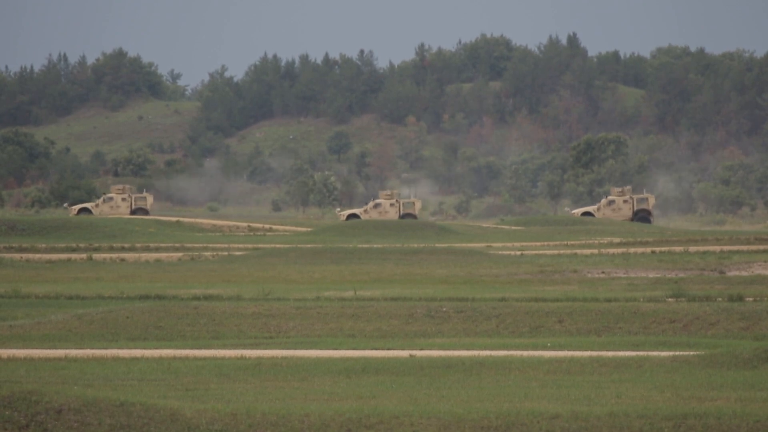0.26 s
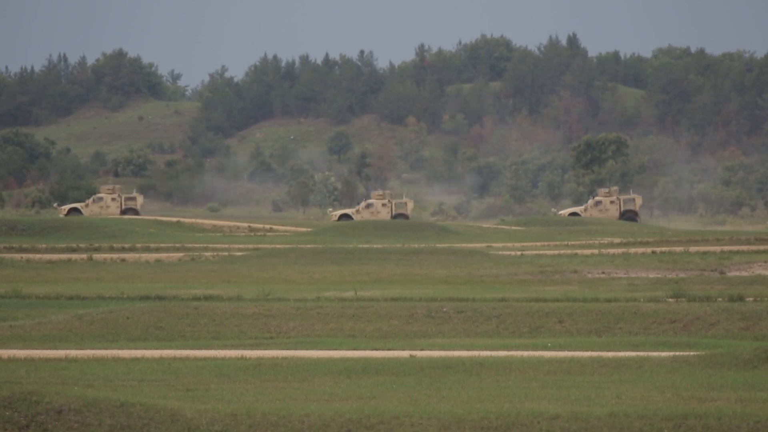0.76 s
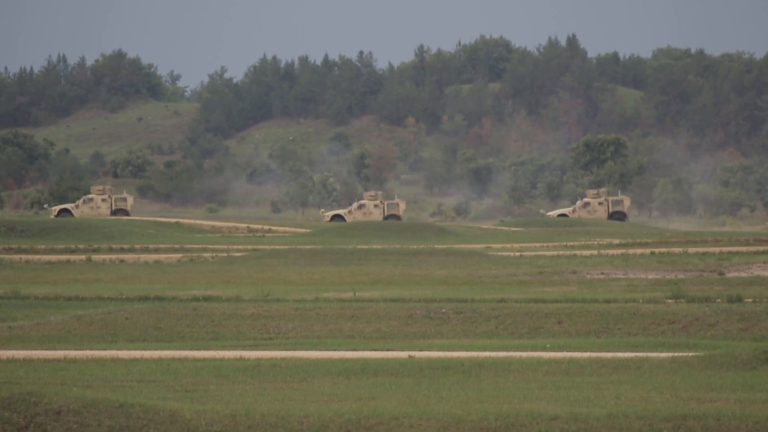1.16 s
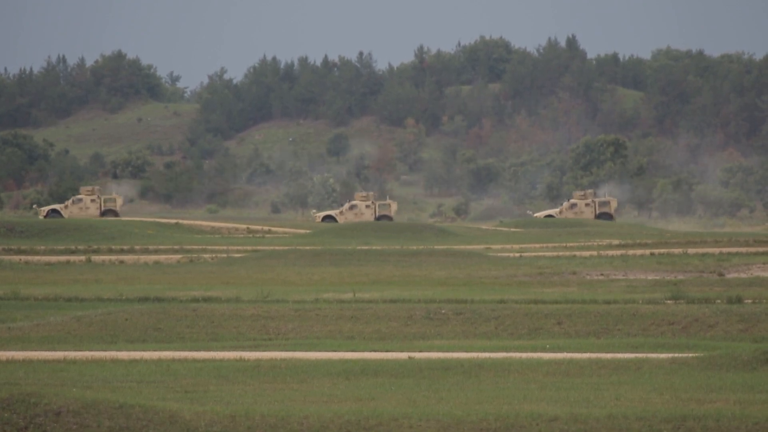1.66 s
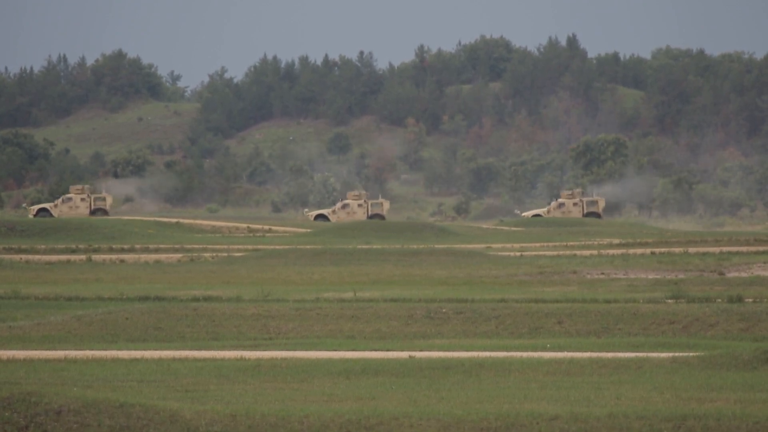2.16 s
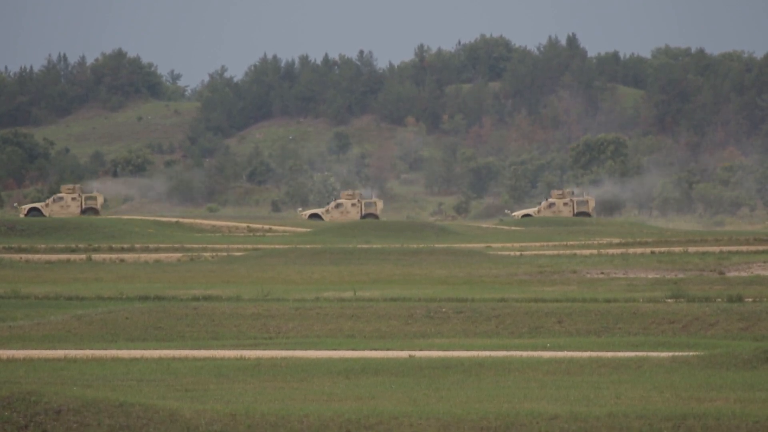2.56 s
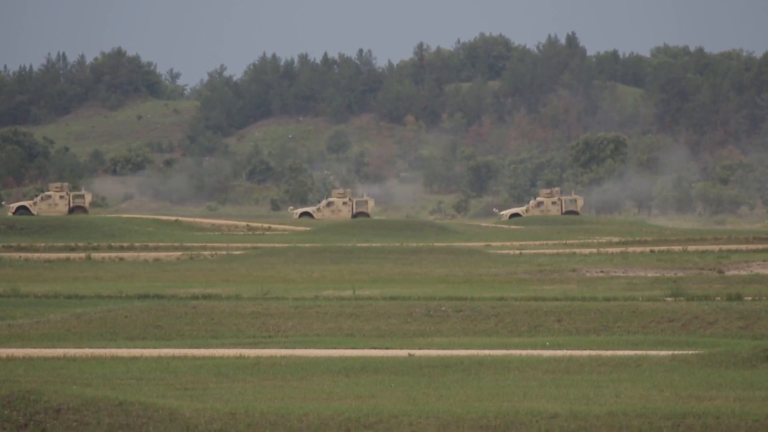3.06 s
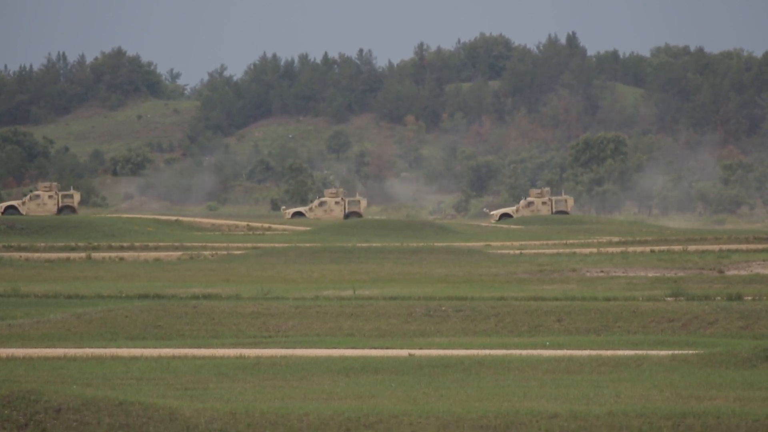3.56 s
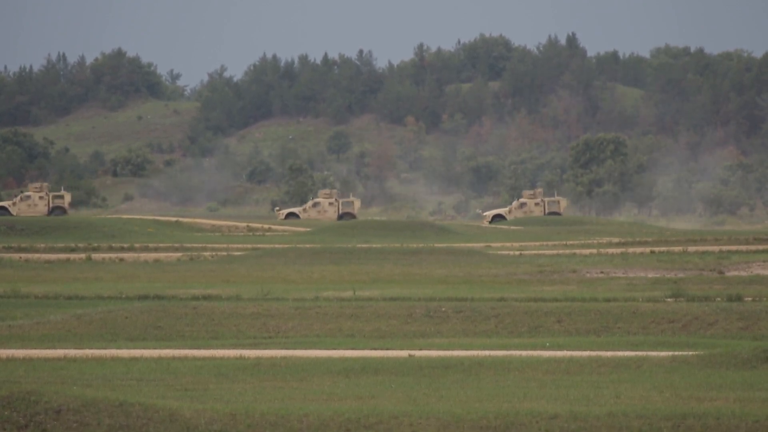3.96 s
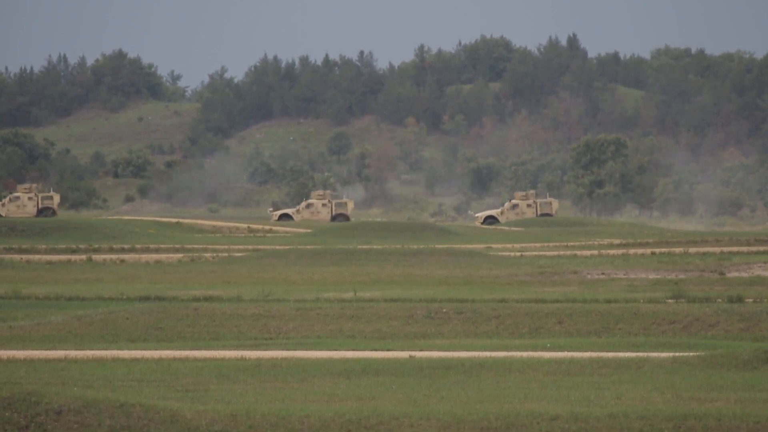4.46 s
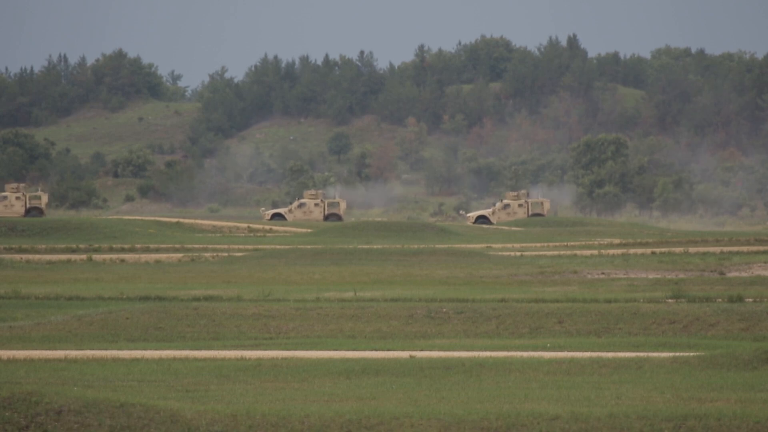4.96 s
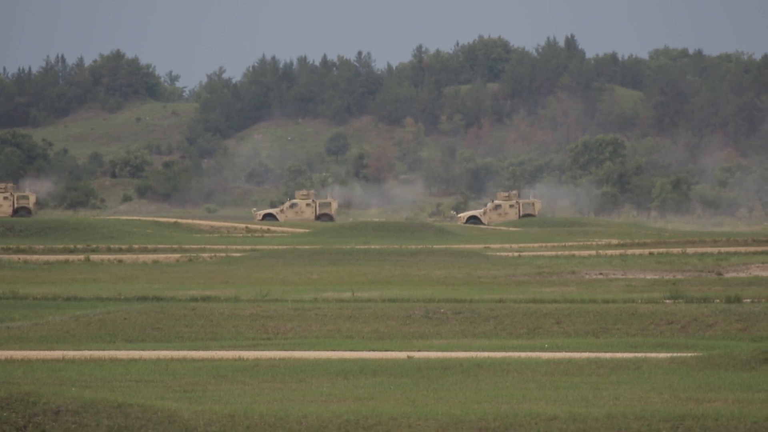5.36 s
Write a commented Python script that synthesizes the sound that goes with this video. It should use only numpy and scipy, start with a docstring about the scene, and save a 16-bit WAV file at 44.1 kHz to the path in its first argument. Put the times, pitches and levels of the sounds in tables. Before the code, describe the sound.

Distant crackling and closer deep, sharp heavy gun bursts hammer outdoors, with rolling hill echoes above a steady diesel rumble and faint hiss.

```python
"""Heavy machine guns on trucks fire overlapping bursts across a grass range: far crackling ones, a deep one, a sharp one.
Each muzzle blast is a shaped pressure front with a bounce off the ground, frayed by the turbulent air;
earth banks, brush, trees and a wooded hill answer with delayed copies and shaped noise.
Underneath, the trucks' engines rumble as wavering tones in coloured noise, loose steel clanks faintly
and distant engines, tyres and wind blend into a background hiss of coloured noise."""
import sys
import numpy as np
from scipy import signal
from scipy.fft import rfft, irfft, next_fast_len
from scipy.io import wavfile
from scipy.ndimage import map_coordinates

SR = 44100
rng = np.random.default_rng(int(sys.argv[2]) if len(sys.argv) > 2 else 0)


def store_pcm(level_fs):
    """Save levels as 16-bit WAV."""
    pcm = np.round(np.clip(level_fs, -1, 1) * 32767).astype(np.int16)
    wavfile.write(sys.argv[1], SR, np.atleast_2d(pcm).T)


N = 247401


def amp(db):
    """Decibels to gain."""
    return 10 ** (np.asarray(db) / 20)


def unit(x):
    """x at rms 1."""
    return x / np.sqrt(np.mean(x ** 2) + 1e-20)


def along(points, hz):
    """Read a curve of (f/Hz, value) points on a log frequency axis."""
    f, v = np.transpose(points)
    return np.interp(np.log(hz + 1), np.log(f + 1), v)


def over_time(points):
    """Read a curve of (t/s, value) points at every sample of the scene."""
    t, v = np.transpose(points)
    return np.interp(np.arange(N) / SR, t, v)


def wobble(rate):
    """A smooth random curve, rate knots a second."""
    knots = rng.standard_normal(int(N * rate / SR) + 4)
    return map_coordinates(knots, [np.arange(N) * rate / SR])


def filtered(x, response):
    """x times a response of frequency, padded so that the end does not wrap round."""
    m = next_fast_len(len(x) + SR // 2)
    spectrum = rfft(x, m) * response(np.fft.rfftfreq(m, 1 / SR))
    return irfft(spectrum, m)[:len(x)]


def noise(spectrum):
    """Noise of rms 1 with the given colour."""
    return unit(filtered(rng.standard_normal(N), lambda hz: amp(along(spectrum, hz))))


def causal(gain):
    """The minimum-phase response with this gain: a sharp front, nothing before it."""
    cepstrum = irfft(np.log(np.maximum(gain, 1e-6)))
    half = len(cepstrum) // 2
    folded = np.r_[cepstrum[0], 2 * cepstrum[1:half], np.zeros(half)]
    return np.exp(rfft(folded))


def below(hz, edge_hz):
    """Gain of a soft low-pass, one half at the edge."""
    return 1 / (1 + (hz / edge_hz) ** 4)


def add(track, s, sound):
    """Mix a sound into the track from time s."""
    part = track[round(s * SR):][:len(sound)]
    part += sound[:len(part)]


def far_guns():
    """Far guns: strong fraying by the air makes each blast crackle, and the hill answers loudest."""
    # far muzzle blast after its way over the range: f/Hz, relative level/dB per Hz
    far_blast = [(35, -14), (70, 6.5), (140, 6), (250, -5.5), (370, -8), (520, -3.5), (850, -7),
                 (1120, -15), (1380, -5.5), (1950, -18), (2550, -11), (3500, -13.5), (4500, -26),
                 (8000, -48)]
    # bursts: level before the gun gain/dB, thump/dB, crack of first shot/dB, crack of last shot/dB,
    # mean lag of the ground bounce/ms, list of shot times t/s; the guns cycle unevenly
    far_bursts = [(-25.4, -1.2, 2.5, -8, .75, [.76, .8968, 1.0128, 1.1209, 1.2313, 1.3412, 1.4657, 1.5802, 1.6917, 1.809, 1.9227, 2.0423]),
                  (-22.4, -3.3, -3, .5, 1.3, [1.816, 1.9329, 2.0732]),
                  (-27.7, 1.5, -.5, -5, 1.45, [3.606, 3.7343, 3.8517, 3.9647, 4.088, 4.2041, 4.3206, 4.4339, 4.5512]),
                  (-22.3, -2.5, 1.5, -2.5, 1.25, [4.669, 4.7802, 4.8944, 5.0127, 5.13, 5.2436])]
    shots = fire(far_bursts, swell_db_per_s=-.8)
    return gun(shots, far_blast, db=27, bounce=0.26, fray_db=7.7, fray_s=0.0031,
               brush_db=-6.5, brush_s=0.014, brush_hz=3920, trees_db=-11.5, trees_s=0.044, hill_db=-4.5)


def deep_gun():
    """Deep gun: a heavy low-mid blast, little frayed, with a weak ground bounce and dull brush."""
    # deep muzzle blast after its way over the range: f/Hz, relative level/dB per Hz
    deep_blast = [(35, -30), (70, 0), (140, 2.5), (250, -6.5), (400, -12), (600, 0.5), (950, -3.5),
                  (1170, -10), (1400, -4.5), (1950, -20), (2600, -13.5), (3400, -13), (4500, -24.5),
                  (8000, -56)]
    # burst: level before the gun gain/dB, thump/dB, crack of first shot/dB, crack of last shot/dB,
    # mean lag of the ground bounce/ms, list of shot times t/s
    deep_bursts = [(-18.1, -.4, 1, -2.5, 1.45, [2.1683, 2.2788, 2.3922, 2.5194])]
    shots = fire(deep_bursts, swell_db_per_s=0)
    return gun(shots, deep_blast, db=27, bounce=0.15, fray_db=-4, fray_s=0.0042,
               brush_db=-4.5, brush_s=.011, brush_hz=1980, trees_db=-17.5, trees_s=.045, hill_db=-9)


def sharp_gun():
    """Sharp gun: its crack swells in mid-burst, and brush and trees throw little back."""
    # sharp muzzle blast after its way over the range: f/Hz, relative level/dB per Hz
    sharp_blast = [(35, -14.5), (70, -4.5), (140, 4), (250, -3.5), (400, -6), (600, 0.5), (900, -9.5),
                   (1150, -21), (1450, -8.5), (2000, -9), (2600, -15), (3400, -13.5), (4500, -26),
                   (8000, -64)]
    # burst: level before the gun gain/dB, thump/dB, crack of first shot/dB, crack of last shot/dB,
    # mean lag of the ground bounce/ms, list of shot times t/s
    sharp_bursts = [(-21, .5, 1.2, -4.3, 1.33, [3.4888, 3.6262, 3.7461, 3.8658, 3.9827, 4.102, 4.2293, 4.3524, 4.4728, 4.5954, 4.7145, 4.8433])]
    shots = fire(sharp_bursts, swell_db_per_s=.6, arch_db=4.5)
    return gun(shots, sharp_blast, db=27, bounce=0.3, fray_db=1, fray_s=0.0029,
               brush_db=-9, brush_s=.011, brush_hz=3520, trees_db=-31, trees_s=0.032, hill_db=-7.5)


def fire(bursts, swell_db_per_s, arch_db=0):
    """Shots as (s, level dB, thump dB, crack dB, bounce lag ms); crack drifts over a burst, straight or in an arch."""
    opening_db = 2  # extra crack of the shot that opens a burst
    # from shot to shot the air changes the crack and the lag of the ground bounce a little
    crack_spread_db, lag_spread_ms = .6, .07
    shots = []
    for level_db, thump_db, first_db, last_db, lag_ms, times in bursts:
        for s, (air, ground) in zip(times, rng.standard_normal((len(times), 2))):
            elapsed = s - times[0]
            progress = elapsed / (times[-1] - times[0])
            drift_db = first_db + (last_db - first_db) * progress + arch_db * np.sin(np.pi * progress)
            crack_db = drift_db + opening_db * (elapsed == 0) + crack_spread_db * air
            shot_level_db = level_db + swell_db_per_s * elapsed
            shots.append((s, shot_level_db, thump_db, crack_db, lag_ms + lag_spread_ms * ground))
    return shots


def gun(shots, blast, db, bounce, fray_db, fray_s, brush_db, brush_s, brush_hz, trees_db, trees_s, hill_db):
    """Each shot is one pressure front that reaches the microphone over many paths."""
    # dull echoes off the earth banks around the listener, the same for every gun: mean delay/s, mean level/dB
    banks = [(.0105, -10), (.0129, -9), (.0306, -17), (.045, -15)]
    # colour of the sound thrown back by brush and trees: f/Hz, relative level/dB per Hz
    foliage_colour = [(100, -20), (300, -7), (600, 2.5), (1100, -5.5), (1500, -2.5), (2000, -5), (3400, -6),
                      (4500, -14.5), (8000, -48.5)]
    track = np.zeros(N)
    t, hz = np.arange(SR // 5) / SR, np.fft.rfftfreq(SR // 5, 1 / SR)

    def late(s):
        """A delay of s seconds as a phase turn."""
        return np.exp(-2j * np.pi * hz * s)

    bass, treble = below(hz, edge_hz=520), 1 - below(hz, edge_hz=1370)
    middle = (hz > 400) & (hz < 1700)
    short_waves = causal(1 - below(hz, edge_hz=678))
    long_waves = causal(below(hz, edge_hz=292))
    foliage = causal(amp(along(foliage_colour, hz)))
    foliage /= np.linalg.norm(irfft(foliage))

    # eddies in the air fray the short waves into a few milliseconds of crackle
    fray_envelope = np.sqrt(t) * np.exp(-t / fray_s)
    frays = amp(fray_db) * short_waves * scatter(fray_envelope, shots, memory=0.56, spread_db=0.5)
    # brush along the way scatters the front, then a row of trees slaps it back
    brush_envelope = np.sqrt(t) * np.exp(-t / brush_s)
    brush = amp(brush_db) * scatter(brush_envelope, shots, memory=0.57, spread_db=5.5)
    brush *= causal(below(hz, edge_hz=brush_hz))  # leaves soak up the treble
    trees_envelope = np.exp(-np.abs(t - trees_s) / 0.011)
    trees = amp(trees_db) * scatter(trees_envelope, shots, memory=.5, spread_db=7)

    for (s, level_db, thump_db, crack_db, lag_ms), fray, thrown_back in zip(shots, frays, brush + trees):
        front = causal(amp(along(blast, hz) + thump_db * bass + crack_db * treble))
        direct = 1 + bounce * late(lag_ms / 1000) + fray
        front /= np.linalg.norm(irfft(front * direct * middle))  # the level counts the middle band
        echoes = 0
        for delay, gain_db in banks:
            echo_gain = amp(gain_db + rng.normal(0, .7))
            echoes = echoes + echo_gain * late(delay + rng.normal(0, 0.00044))
        arrival = front * (direct + long_waves * echoes) + foliage * thrown_back
        add(track, s, amp(level_db + db) * irfft(arrival))
        add(track, s, amp(level_db + db + hill_db) * hill())
    return track


def scatter(envelope, shots, memory, spread_db):
    """For each shot the response, at energy 1, of many uneven paths that drift from one shot to the next."""
    draws = rng.standard_normal((len(shots) + 4, len(envelope)))  # four extra rows let the drift settle
    drifting = signal.lfilter([1], [1, -np.clip(memory, 0, .9)], draws, axis=0)[-len(shots):]
    paths = drifting * envelope * amp(spread_db * rng.standard_normal(len(envelope)))
    return rfft(paths / np.linalg.norm(paths, axis=1, keepdims=True))


def hill():
    """The wooded hill answers with one second of rolling noise at energy 1; the bass lasts longest."""
    # colour of the answer: f/Hz, relative level/dB per Hz
    hill_colour = [(40, -3.5), (90, 1.5), (200, -8.5), (380, -9), (650, -17.5), (1500, -19.5),
                   (3300, -29.5), (5000, -47), (8000, -71.5)]
    # its decay: f/Hz, t60/s
    hill_decay = [(80, 1.2), (500, 0.72), (3000, 0.63)]
    hz, t, z = signal.stft(rng.standard_normal(SR), SR, nperseg=512)
    fading = z * amp(-60 * t / along(hill_decay, hz)[:, None])
    tail = signal.istft(fading, SR, nperseg=512)[1][:SR]
    tail = filtered(tail, lambda f: amp(along(hill_colour, f)))
    tail = tail * (1 - np.exp(-np.arange(SR) / SR / 0.0092))  # soft onset
    return tail / np.linalg.norm(tail)


def trucks():
    """Engines: wavering sine tones in a lumpy exhaust rumble of coloured noise."""
    # engine and drive tones: f/Hz, mean level before the common trim/dB
    engine = [(39.3, -47.5), (134, -55), (167, -50.5), (203, -50.5), (296, -57), (622, -60.5)]
    # colour of the exhaust rumble: f/Hz, relative level/dB per Hz
    rumble_colour = [(20, -38), (32, -21), (55, -17), (80, -4.5), (110, -1), (160, -4.5), (208, -1.5),
                     (240, -13.5), (300, -8), (450, -21), (650, -39.5)]
    # exhaust rumble over time: t/s, mean level/dB
    throttle = [(0, -40.5), (3.1, -42), (5.6, -39.8)]
    t = np.arange(N) / SR
    tones = np.zeros(N)
    for hz, db in engine:
        phase = 2 * np.pi * hz * (t + 0.001 * wobble(6))  # the shaft speed drifts
        tones += np.sqrt(2) * amp(db + 0.94 * wobble(3.6)) * np.sin(phase)
    rumble = amp(over_time(throttle) + 1.0 * wobble(8.4)) * noise(rumble_colour)
    return amp(-1.5) * tones + rumble


def clanks():
    """Loose steel knocks briefly on the trucks; a free fitting rings, a held one hardly does."""
    # faint clanks: t/s, peak level/dB, ring over knock level/dB
    clank_times = [(.158, -34, 1), (.634, -34, -16)]
    # ringing modes of a loose fitting: f/Hz, relative level/dB, t60/s
    steel = [(636, -6, .04), (1080, -11, 0.037), (1910, -14, .02), (2520, 1, 0.03)]
    track, t = np.zeros(N), np.arange(SR // 4) / SR
    modes = sum(amp(db - 60 * t / t60) * np.sin(2 * np.pi * hz * t) for hz, db, t60 in steel)
    for s, db, ring_db in clank_times:
        rattle = rng.standard_normal(len(t)) * amp(-60 * t / 0.071)
        knock = unit(filtered(rattle, lambda hz: below(hz, edge_hz=4300) ** 2))
        ring = unit(signal.fftconvolve(rattle, modes)[:len(t)])
        sound = knock + amp(ring_db) * ring
        add(track, s, amp(db) * sound / np.abs(sound).max())
    return track


def background_hiss():
    """Background hiss of distant engines, tyres and wind: coloured noise whose level rises and falls along a
    curve and flutters."""
    # background hiss over time, its rises set by hand: t/s, mean level/dB
    hiss_level = [(0, -49), (.6, -50), (1.6, -45), (3.0, -49.8), (4.5, -44), (5.6, -46)]
    # colour of the hiss: f/Hz, relative level/dB per Hz
    hiss_colour = [(260, -46), (450, -7), (620, -11.5), (800, -11.5), (1000, -10.5), (1500, -15.5),
                   (3400, -13.5), (4000, -21.5), (4600, -22), (5000, -52), (6500, -63)]
    return amp(over_time(hiss_level) + 0.71 * wobble(6.9)) * noise(hiss_colour)


def scene():
    """The guns over the trucks and the background hiss."""
    guns = far_guns() + deep_gun() + sharp_gun()
    return (guns + trucks() + clanks() + background_hiss())[None]


def record(dry):
    """The recorder rounds the highest peaks, trims both ends of the band and adds its own hiss."""
    ceiling, hardness = .62, 5
    rounded = dry[0] / (1 + np.abs(dry[0] / ceiling) ** hardness) ** (1 / hardness)
    dull = filtered(rounded, lambda hz: below(hz, edge_hz=5400) ** 2 * (1 - below(hz, edge_hz=28)))
    hiss = amp(-69) * noise([(5000, 0.82), (8000, -.5), (15000, -2)])
    return filtered(dull + hiss, lambda hz: hz < 15200)[None]  # nothing above the top of the band


dry = scene()
out = record(dry)
store_pcm(out)
```